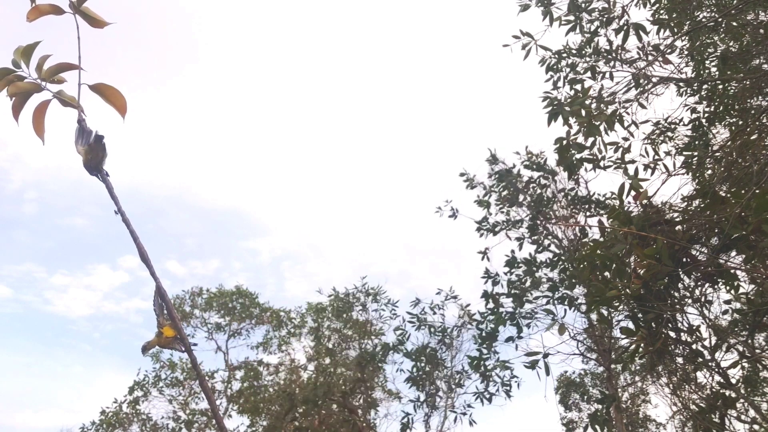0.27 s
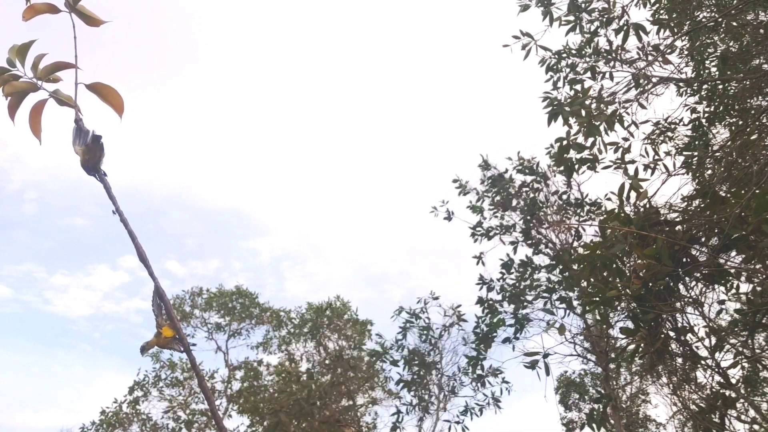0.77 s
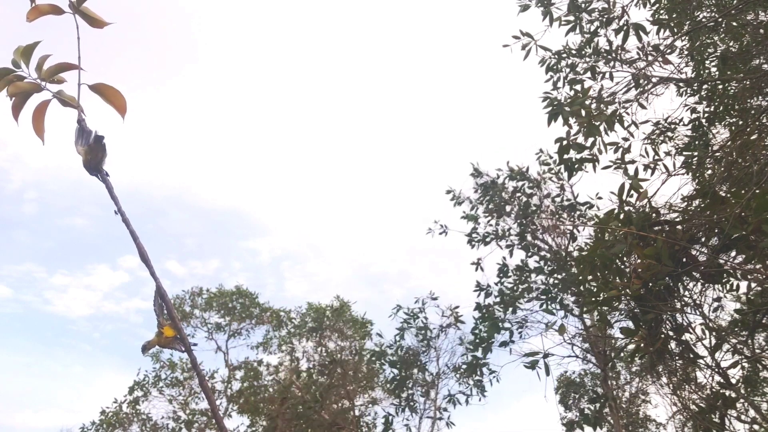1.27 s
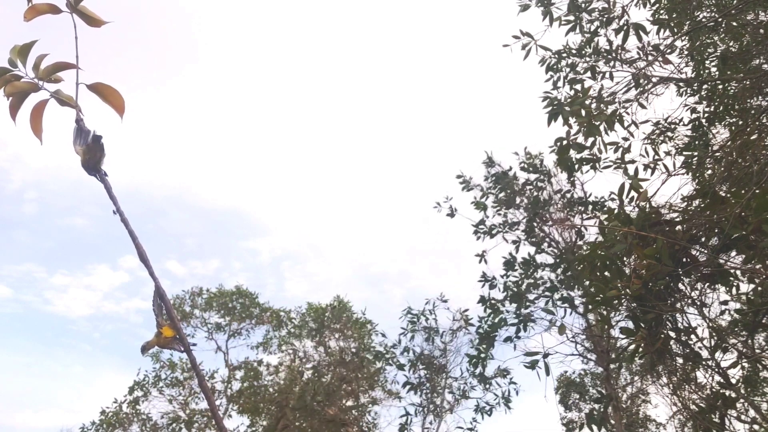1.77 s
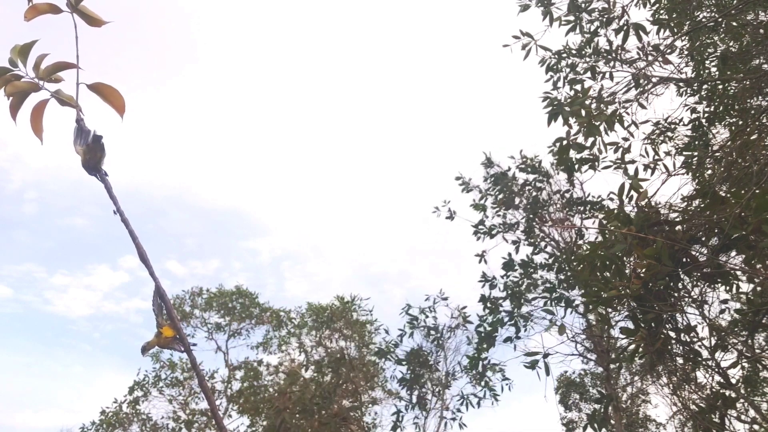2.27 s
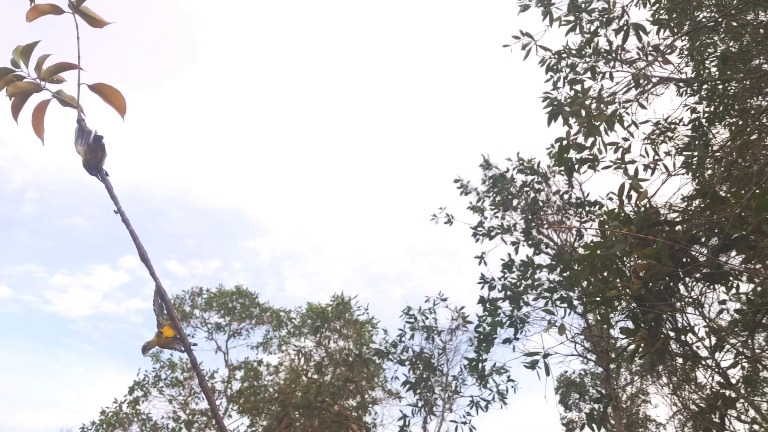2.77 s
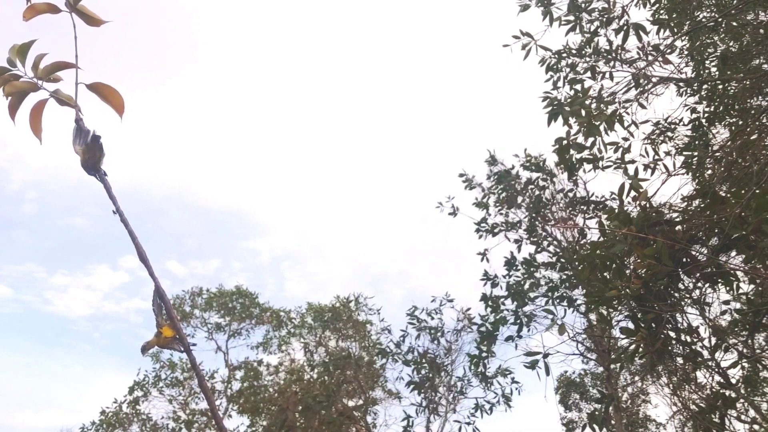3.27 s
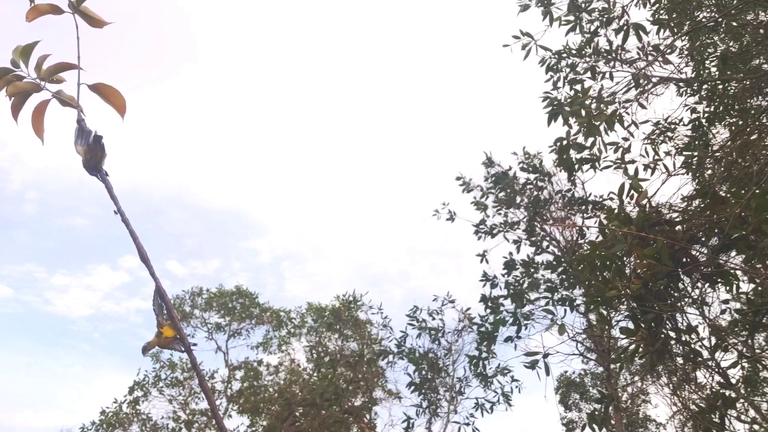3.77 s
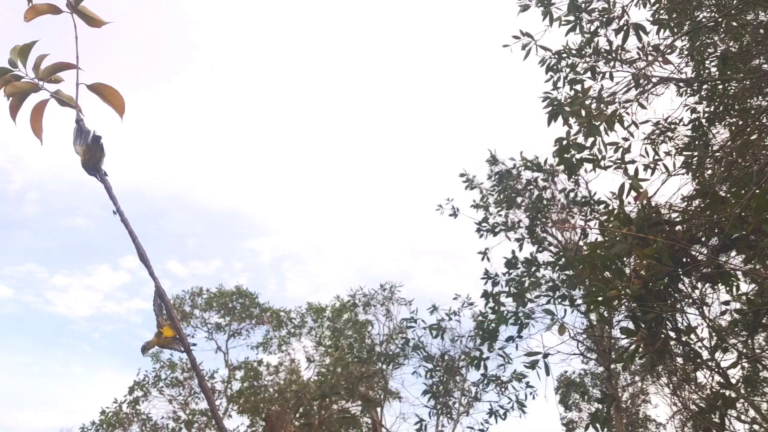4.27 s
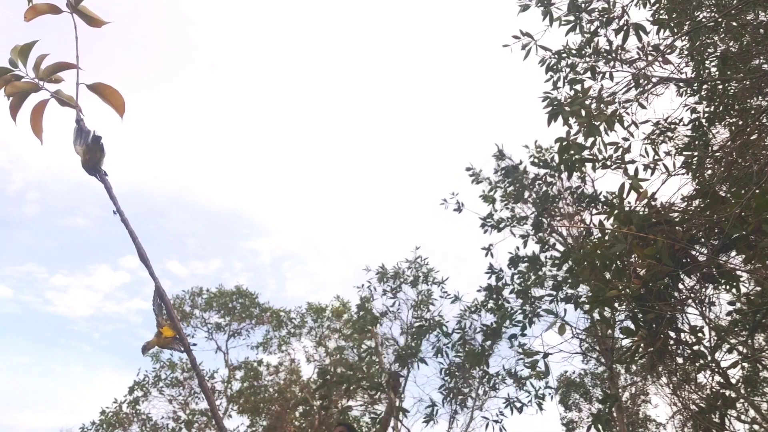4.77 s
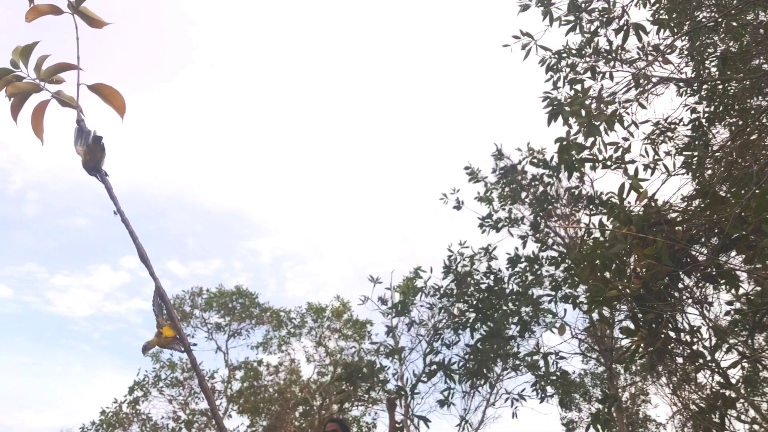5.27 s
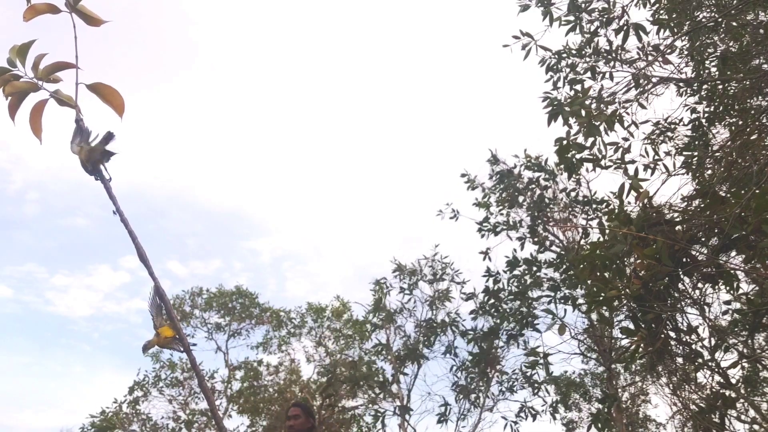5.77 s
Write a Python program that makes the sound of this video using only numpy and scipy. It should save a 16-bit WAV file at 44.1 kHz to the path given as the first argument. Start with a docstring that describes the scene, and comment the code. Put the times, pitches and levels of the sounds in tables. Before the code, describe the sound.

At a quiet forest edge, crickets chirr steadily, with a nearer one chirping evenly on the right. A distant one-cylinder engine puffs and clatters as it speeds up, then soon drops to a soft, uneven throb. Small birds twitter in high, brief notes, joined later by thin falling whistles. Close to the left of the microphone, something dry ticks and rustles lightly, growing stronger near the end.

```python
"""A slow one-cylinder engine, far off from a forest edge, puffs and clatters as it speeds up,
then is throttled back to a soft uneven throb. Crickets chirr in the trees, scraping their wings,
over the hush of still air. Close to the left of the microphone something dry rustles and ticks.
One nearer cricket chirps on the right, and small birds twitter from a branch and from deeper in,
their notes scattered by trunks and leaves."""
import sys
import numpy as np
from scipy import signal
from scipy.fft import rfft, irfft, next_fast_len
from scipy.io import wavfile
from scipy.ndimage import uniform_filter1d

SR = 44100
rng = np.random.default_rng(int(sys.argv[2]) if len(sys.argv) > 2 else 0)


def generate_wav(sig):
    """Save sig (samples, or channels by samples) to the path in sys.argv[1] as 16-bit PCM at SR."""
    pcm = np.round(np.clip(np.atleast_2d(sig).T, -1, 1) * 32767).astype(np.int16)
    wavfile.write(sys.argv[1], SR, pcm)


N = 265967
TIME = np.arange(N) / SR
PADDED = next_fast_len(N + SR // 2, real=True)
HZ = np.fft.rfftfreq(PADDED, 1 / SR)


def gain_of(db):
    """Decibels to amplitude."""
    return 10 ** (np.asarray(db) / 20)


def unit_rms(x):
    """Scales to rms 1."""
    return x / np.sqrt(np.mean(x ** 2) + 1e-20)


def at_hz(points, hz):
    """Reads (frequency [Hz], value) rows on a log-frequency axis."""
    f, value = np.transpose(points)
    return np.interp(np.log(hz + 1), np.log(f + 1), value)


def curve(rows):
    """Joins (time [s], value) rows by straight lines."""
    return np.interp(TIME, *np.transpose(rows))


def repeats(first_s, pace):
    """Times of an event recurring from first_s on, at a pace of (time [s], rate [1/s]) rows."""
    turns = np.cumsum(curve(pace)) / SR
    first_turn = np.interp(first_s, TIME, turns)
    return np.interp(np.arange(first_turn, turns[-1]), turns, TIME)


def add(mix, s, sound):
    """Mixes a sound in at time s."""
    at = round(s * SR)
    sound = sound[max(-at, 0):]
    part = mix[max(at, 0):][:len(sound)]
    part += sound[:len(part)]


def pan(side_db):
    """Gains at the two microphones for a level difference, left minus right."""
    return gain_of([[side_db / 2], [-side_db / 2]])


def coloured(x, spectrum):
    """Gives a sound a spectrum, keeping the power of white noise."""
    response = unit_rms(gain_of(at_hz(spectrum, HZ)))
    return irfft(rfft(x, PADDED) * response, PADDED)[..., :N]


def drift(per_s):
    """A random wander of rms about 1, with per_s turning points a second."""
    knots = rng.standard_normal(4000)
    return np.interp(TIME * per_s, np.arange(len(knots)), knots)


# likeness of the two microphones in sound from all sides: (frequency [Hz], correlation [-1 to 1])
MIC_COHERENCE = [(60, 0.97), (130, 0.97), (290, 0.88), (640, 0.12), (1400, -0.031), (3000, 0.13),
                 (14000, -0.26)]
def diffuse(spectrum):
    """Noise from all sides: alike at both microphones only in the bass."""
    common, separate = rfft(rng.standard_normal((2, PADDED)))
    likeness = np.clip(at_hz(MIC_COHERENCE, HZ), -1, 1)
    pair = np.array([common, likeness * common + np.sqrt(1 - likeness ** 2) * separate])
    return unit_rms(irfft(pair * gain_of(at_hz(spectrum, HZ)), PADDED)[:, :N])


# reverberation at the forest edge: (frequency [Hz], time to fall 60 dB [s])
FOREST_DECAY = [(200, 0.31), (3000, 0.091), (7000, 0.34), (14000, 0.028)]
def forest(x):
    """Stereo scatter from trunks and leaves, the highest treble dying first."""
    reflections = rng.standard_normal((2, SR // 2)) * (rng.random((2, SR // 2)) < .1)
    hz, t, bands = signal.stft(reflections, SR, nperseg=256)
    decay = gain_of(-60 * t / at_hz(FOREST_DECAY, hz)[:, None])
    tail = signal.istft(bands * decay, SR, nperseg=256)[1]
    tail /= np.linalg.norm(tail, axis=1, keepdims=True)
    return signal.fftconvolve(x[None], tail, axes=1)[:, :N]


# speed of the distant engine: (time [s], firing rate [1/s])
ENGINE_SPEED = [(0, 9.96), (0.3, 11.78), (0.75, 14.04), (1.25, 16.32), (2.5, 14.98), (2.9, 11.25),
                (3.4, 12.89), (3.7, 11.26), (4.2, 14.9), (4.75, 16.34), (5.0, 11.49), (5.45, 15.98),
                (6.0, 10.21)]
# how hard it works: (time [s], exhaust level [dB], clatter share [0-1])
ENGINE_LOAD = [(0, -34, 0.37), (.47, -31, 0.4), (.77, -33, 0.6), (.97, -31.5, 0.57), (1.23, -31, 0.67),
               (1.3, -33.5, 0.56), (1.345, -37.5, 0.4), (1.5, -49.5, 0.18), (2.6, -39.5, 0.08),
               (2.9, -50, .14), (3.28, -39.5, 0.13), (4, -51.5, 0.03), (6, -60, 0.09)]
# its clatter from across the distance: (frequency [Hz], relative level [dB])
CLATTER_SPECTRUM = [(300, -32), (700, 1.5), (1200, 2), (1600, 4), (2100, 6), (2800, -2), (4000, -4.5),
                    (9000, -33)]
# its low drone, scattered by the forest: (time [s], level [dB])
DRONE_LEVELS = [(0, -51), (1.3, -50.5), (1.5, -51), (3, -50.5), (3.4, -52.5), (6, -51.5)]
# colour of that drone: (frequency [Hz], relative level [dB])
DRONE_SPECTRUM = [(15, -6), (30, 1), (42, -6.5), (62, 5), (85, -3.5), (135, -4), (200, -9.5), (290, -16.5),
                  (430, -22), (600, -34), (1000, -43.5), (2500, -63)]
def engine(puff_s=0.0035, skew=0.1, lean=0.097, front_s=0.00986, rise_s=0.00294,
           echo_s=0.01315, echo_db=-17, clatter_db=-60.5, clatter_s=0.023, lead_s=.007):
    """Far off, each exhaust puff pushes, pulls and pushes more softly, led by clatter under load."""
    full_db, uneven_db, uneven_per_db = -38, 0.04, 0.1243
    t = np.arange(-SR // 30, SR // 30) / SR
    load_s, exhaust_db, clatter_share = np.transpose(ENGINE_LOAD)
    thumps, knocks = np.zeros(N), np.zeros(N)
    firings = repeats(first_s=0.03015, pace=ENGINE_SPEED)
    for s, (stretch, force) in zip(firings, rng.standard_normal((200, 2))):
        db = np.interp(s, load_s, exhaust_db)
        # firings grow uneven as the exhaust weakens below its full level
        db += force * (uneven_db + uneven_per_db * max(full_db - db, 0))
        u = t / (puff_s * (1 + 0.077 * stretch))
        u = u * (1 - skew * np.tanh(u))  # the second push is slower
        front = np.clip((t + front_s) / rise_s, 0, 1)
        puff = front * (u ** 2 - 1) * np.exp(-u ** 2 / 2 - lean * u)
        add(thumps, s + t[0], gain_of(db) * puff)
        add(knocks, s - lead_s, np.exp(-(t - t[0]) / clatter_s))
    echo = gain_of(echo_db) * np.interp(TIME - echo_s, TIME, thumps)
    clatter_gain = gain_of(clatter_db) * np.interp(TIME, load_s, clatter_share)
    clatter = clatter_gain * (knocks + 0.33) * diffuse(CLATTER_SPECTRUM)
    drone = gain_of(curve(DRONE_LEVELS) + 0.5 * drift(14)) * diffuse(DRONE_SPECTRUM)
    return (thumps + echo + drone) * pan(-1.14) + clatter


# kinds of cricket back in the trees:
# (pitch [Hz], resonance width [Hz], mean stroke rate [1/s], level [dB], left minus right [dB])
FAR_CRICKETS = [(5450, 740, 50, -72.5, -6), (7467, 230, 45, -65, -5), (7840, 470, 63, -67.5, -7.5),
                (8920, 930, 120, -64.5, -5.5), (9140, 740, 140, -67.5, 6.5)]
def cricket_chorus(per_kind=8, waver_db=0.5, skirt=1.97, direct_db=-2.5):
    """Many far crickets: trains of wing strokes, each ringing the wing, blurred by the trees."""
    out = np.zeros((2, N))
    # over so many paths the trees smear the strokes in time without colouring them
    paths = gain_of(direct_db) + rfft(forest(signal.unit_impulse(N)), PADDED)
    blur = np.exp(1j * np.angle(paths))
    for hz, width_hz, rate, db, side_db in FAR_CRICKETS:
        strokes = np.zeros((2, N))
        for pace, start in rng.random((per_kind, 2)):
            turns = np.floor(TIME * rate * (.8 + .4 * pace) + start)
            at = np.flatnonzero(np.diff(turns))
            # leaves scatter each stroke, so it reaches the two microphones with unrelated sizes
            strokes[:, at] += rng.standard_normal((2, SR // 10))[:, :len(at)]
        wing = (1 + ((HZ - hz) / width_hz) ** 2) ** -skirt
        trill = unit_rms(irfft(rfft(strokes, PADDED) * wing * blur, PADDED)[:, :N])
        out += gain_of(db + waver_db * drift(5.2)) * pan(side_db) * trill
    return out


# still air among the trees: (frequency [Hz], relative level [dB])
AIR_SPECTRUM = [(100, -10), (500, 3), (800, -1), (1150, -0.5), (2000, 1), (3200, -1), (4500, -1.5),
                (5500, 1), (7000, -0.5), (10000, -0.5), (12000, -3.5), (14500, -6)]
def still_air(db=-65.0, waver_db=1.44):
    """A faint, wavering hush all around the microphones."""
    return gain_of(db + waver_db * drift(4.21)) * diffuse(AIR_SPECTRUM)


# strength of the dry rustle, close on the left: (time [s], relative level [dB])
RUSTLE_STRENGTH = [(0, -72.5), (1.25, -71), (1.45, -77.5), (2.1, -74), (2.2, -70), (2.3, -77), (2.6, -79.5),
                   (2.72, -72.5), (2.85, -77), (3.72, -80.5), (3.89, -66), (3.98, -65.5), (4.01, -65.5),
                   (4.07, -64), (4.17, -67), (4.6, -75), (5.12, -73), (5.28, -64.5), (5.51, -64.5),
                   (5.56, -59.5), (5.6, -56), (5.68, -65.5), (5.85, -65.5), (6.03, -66)]
# colour of light brushing: (frequency [Hz], relative level [dB])
BRUSH_SPECTRUM = [(500, -19), (2000, -19), (5000, -6.5), (8000, -6.5), (10000, -3.5), (12500, -2),
                  (14500, -3.5)]
# colour of firmer rubbing: (frequency [Hz], relative level [dB])
RUB_SPECTRUM = [(200, -2), (700, 9.5), (1000, 5), (1700, 3.5), (2300, 1), (3600, 3), (4700, -11), (7000, 0),
                (10000, -0.5), (14000, -15)]
# dull scuffs where the rubbing catches: (time [s], level [dB])
RUB_SCUFFS = [(5.127, -74), (5.642, -59.5), (6.002, -67.5)]
def rustle(slips_per_s=2500, slip_db=2.0, brush_db=5.0, scuff_s=0.0075):
    """Beside the microphone tiny dry slips crowd into a fizz; firmer rubbing adds body and scuffs."""
    firm_db, rub_db, rub_growth = -55, -57.5, 1.31
    sizes = gain_of(slip_db * np.minimum(rng.exponential(1, (2, N)), 4))
    slips = sizes * rng.standard_normal((2, N)) * (rng.random((2, N)) < slips_per_s / SR)
    fizz = unit_rms(0.51 * unit_rms(slips) + rng.standard_normal((2, N)))
    strength_db = curve(RUSTLE_STRENGTH) + .7 * drift(15) + 1.5 * drift(140)
    brush = gain_of(strength_db + brush_db) * coloured(fizz, BRUSH_SPECTRUM) * pan(11.6)
    # rubbing grows faster than brushing as the rustle firms up
    pressure = gain_of(rub_db + rub_growth * (strength_db - firm_db))
    for s, db in RUB_SCUFFS:
        pressure += gain_of(db) * np.exp(-((TIME - s) / scuff_s) ** 2)
    rub = pressure * coloured(fizz[::-1], RUB_SPECTRUM) * pan(-2.4)
    return brush + rub


# dry snaps close to the left microphone: (time [s], relative level [dB], decay [s])
DRY_TICKS = [(0.064, -41, .0015), (.447, -28.5, 0.0006), (.6265, -38, .0006), (2.1883, -25.5, 0.0007),
             (2.192, -44, .005), (2.215, -49, .004), (2.754, -43, .0015), (3.8796, -37, 0.0024),
             (3.9962, -29.5, 0.0009), (4.0594, -42, .001), (5.331, -37, 0.001), (5.373, -37.5, 0.0014),
             (5.4262, -35.5, 0.001), (5.595, -30, .002), (5.998, -42, .001)]
def ticks(tail_db=-26, tail_s=0.018, right_db=-7.5, rebound_s=0.0051, rebound_db=-12):
    """Sharp little snaps at close range, each with a rebound and a short scatter."""
    t = np.arange(SR // 12) / SR
    out = np.zeros((2, N))
    for s, db, decay_s in DRY_TICKS:
        crack, rebound, *scatters = .5 * gain_of(db) * np.sign(rng.standard_normal((4, len(t))))
        decay = np.exp(-t / decay_s)
        for mic, scatter in zip(out, scatters):
            add(mic, s, crack * decay + gain_of(tail_db) * scatter * np.exp(-t / tail_s))
            add(mic, s + rebound_s, gain_of(rebound_db) * rebound * decay)
    # the recorder's body shades the top treble on the right: (frequency [Hz], relative level [dB])
    left = coloured(out[0], [(300, -18), (2000, -23), (6000, -25), (7500, -9), (9500, -11),
                             (11500, -2), (14000, -1.5), (16000, -25)])
    right = coloured(out[1], [(300, -12), (2000, -11), (4500, -10.5), (7700, 2.5), (10000, -2.5),
                              (14500, -13)])
    return np.array([left, gain_of(right_db) * right])


# pace of the nearer cricket on the right, which hesitates once: (time [s], chirp rate [1/s])
CRICKET_PACE = [(0, 5.84), (1.2, 5.95), (2, 5.92), (2.8, 6.04), (3.4, 5.83), (4.88, 5.84), (4.98, 3.85),
                (5.085, 5.97), (6, 5.97)]
def near_cricket(hz=5600, sag_hz=290, strokes=6, strokes_per_s=80, stroke_s=.0068,
                 chirp_db=-54, spread_db=0.24, direct_gain=0.57, echo_db=-14.5):
    """Each chirp is a few strokes of file over scraper, ringing the wing at a sagging pitch."""
    u = np.linspace(0, 1, int(stroke_s * SR))
    song = np.zeros(N)
    for s in repeats(first_s=.1375, pace=CRICKET_PACE):
        db = chirp_db + spread_db * rng.standard_normal()
        for k in np.arange(strokes) - (strokes - 1) / 2:
            detune, force, late = rng.standard_normal(3)
            pitch = hz + 30 * detune + sag_hz * (.5 - u)
            stroke = np.sin(np.pi * u) * np.sin(2 * np.pi * np.cumsum(pitch) / SR)
            start_s = s + k / strokes_per_s - stroke_s / 2 + 0.00037 * late
            add(song, start_s, gain_of(db + 1.4 * force) * stroke)
    return direct_gain * song * pan(-6) + gain_of(echo_db) * forest(song) * pan(-12)


def bird_note(length_s, start_hz, middle_hz, end_hz, lower_db, quiver=.023):
    """A quivering glide on the third harmonic of the syrinx, with the second below it."""
    u = np.linspace(0, 1, int(length_s * SR))
    glide = np.polyval(np.polyfit([0, .5, 1], [start_hz, middle_hz, end_hz], 2), u)
    wobble = unit_rms(uniform_filter1d(rng.standard_normal(SR // 4), size=60))[:len(u)]
    phase = 2 * np.pi * np.cumsum(glide * (1 + quiver * wobble)) / SR
    tone = np.sin(phase) + gain_of(lower_db) * np.sin(phase * 2 / 3)
    return signal.windows.tukey(len(u), .5) * tone


# notes from a nearby branch:
# (time [s], length [s], start pitch [Hz], middle pitch [Hz], end pitch [Hz], relative level [dB])
NEAR_NOTES = [(.325, 0.078, 5450, 6230, 6640, -61), (0.389, 0.045, 5760, 6080, 6150, -59),
              (0.517, 0.021, 4650, 5400, 6300, -56), (0.531, 0.019, 6150, 6580, 6250, -51),
              (.7, .02, 6300, 6700, 6600, -59), (0.782, 0.018, 6600, 6350, 5800, -56),
              (0.974, .014, 6200, 6650, 6700, -62), (1.072, 0.02, 5900, 6300, 6100, -56.5),
              (1.198, .02, 7400, 7000, 6700, -59), (1.338, .02, 5870, 6500, 6550, -62),
              (1.554, .024, 6050, 6380, 6600, -57), (1.639, 0.02, 6600, 6270, 6000, -52),
              (1.749, 0.034, 6000, 6590, 6150, -55), (1.78, 0.013, 6050, 6420, 6800, -54),
              (1.8, 0.019, 6720, 6280, 5600, -49), (1.9, 0.043, 6010, 6710, 6260, -53.5),
              (1.941, .028, 6410, 6950, 7730, -51.5), (1.962, .012, 6970, 6040, 5400, -49.5),
              (1.993, 0.0316, 5600, 6000, 6630, -52), (2.433, 0.022, 6840, 6340, 5760, -56),
              (2.969, 0.01, 6970, 6030, 5700, -50), (2.982, 0.01, 6200, 6400, 6200, -50.5),
              (4.213, 0.012, 7200, 7060, 6700, -58), (4.269, .018, 7170, 6700, 5960, -55),
              (4.341, .02, 6300, 6700, 7150, -59), (4.397, 0.02, 6350, 6700, 6900, -53.5),
              (4.779, .012, 6500, 6000, 5700, -56), (4.847, .017, 5800, 6200, 6350, -56),
              (4.925, 0.014, 5800, 6440, 6950, -52), (5.783, 0.019, 6400, 6580, 6600, -55)]
def near_birds(level_db=-5.5, echo_db=1.5, peep_s=.03):
    """Falling chips, arched peeps and rising slurs near the centre, with the forest's echo."""
    song = np.zeros(N)
    for s, length_s, start_hz, middle_hz, end_hz, db in NEAR_NOTES:
        long_peep = middle_hz > max(start_hz, end_hz) and length_s > peep_s
        lower_db = -8.5 if long_peep else -16
        add(song, s, gain_of(db) * bird_note(length_s, start_hz, middle_hz, end_hz, lower_db))
    return gain_of(level_db) * (song + gain_of(echo_db) * forest(song)) * pan(-0.67)


# whistles from deeper in the trees, to the right:
# (time [s], length [s], start pitch [Hz], end pitch [Hz], relative level [dB])
FAR_WHISTLES = [(3.99, .016, 3800, 3250, -62), (4.21, .02, 4500, 3250, -61), (4.275, .022, 4000, 4450, -63),
                (4.335, .02, 4400, 3850, -65), (4.47, .026, 3950, 3600, -65),
                (4.495, .055, 4950, 4300, -69), (4.765, .03, 5150, 4600, -68),
                (4.795, .05, 4850, 4050, -66), (5.048, .028, 5350, 4550, -65),
                (5.078, .066, 5050, 3450, -67), (5.39, .1, 4900, 3050, -65), (5.68, .078, 5000, 3850, -64),
                (5.975, .05, 5500, 4500, -64)]
def far_bird(level_db=-6, echo_db=1):
    """Thin single-tone whistles, mostly falling, with the forest's echo."""
    song = np.zeros(N)
    for s, length_s, start_hz, end_hz, db in FAR_WHISTLES:
        whistle = bird_note(length_s, start_hz, (start_hz + end_hz) / 2, end_hz, lower_db=-np.inf)
        add(song, s, gain_of(db) * whistle)
    return gain_of(level_db) * (song + gain_of(echo_db) * forest(song)) * pan(-6)


def scene():
    """The forest edge as it reaches a stereo pair of microphones."""
    background = still_air() + engine() + cricket_chorus()
    singers = near_cricket() + near_birds() + far_bird()
    return background + singers + rustle() + ticks()


def record(dry, edge_hz=14330):
    """The recorder's band limit."""
    lowpass = signal.firwin(511, edge_hz, window=("kaiser", 9), fs=SR)
    return signal.oaconvolve(dry, lowpass[None], "same")


dry = scene()
out = record(dry)
generate_wav(out)
```